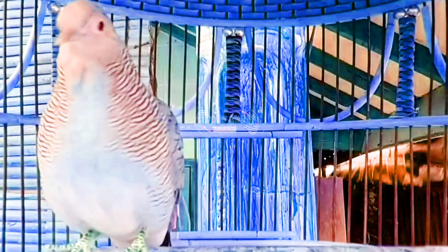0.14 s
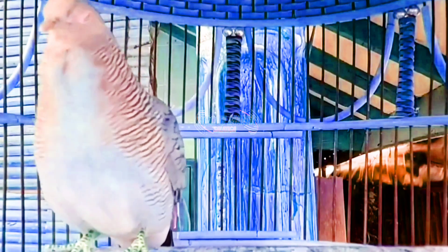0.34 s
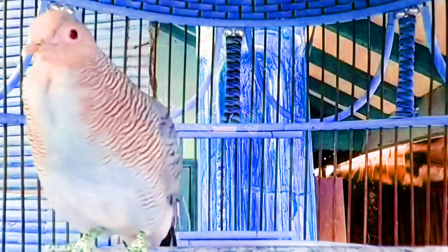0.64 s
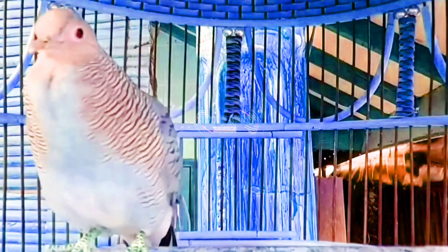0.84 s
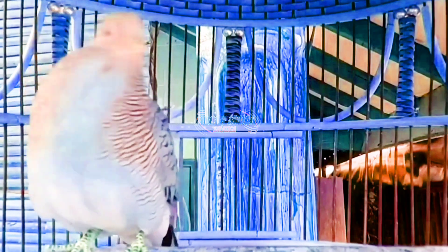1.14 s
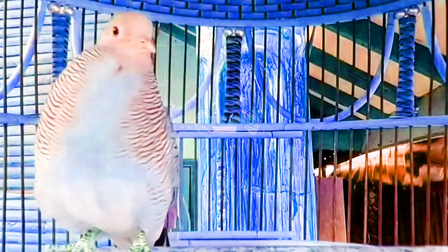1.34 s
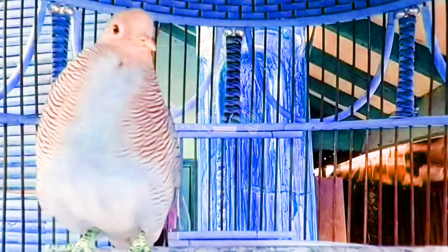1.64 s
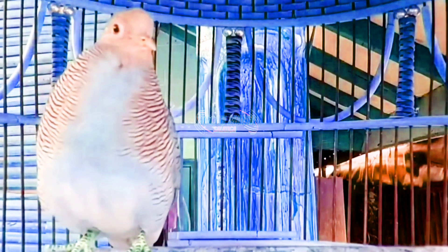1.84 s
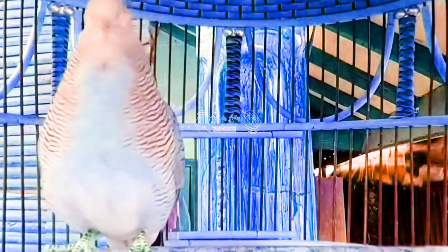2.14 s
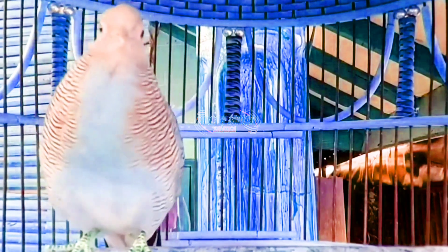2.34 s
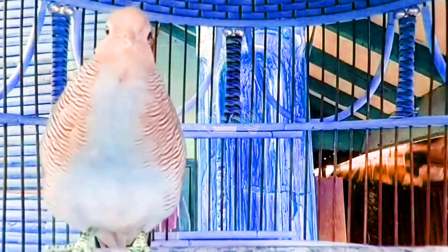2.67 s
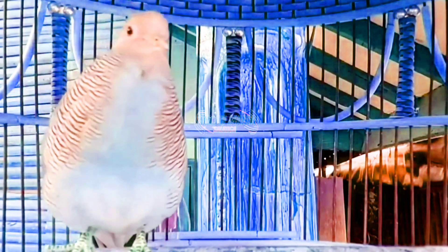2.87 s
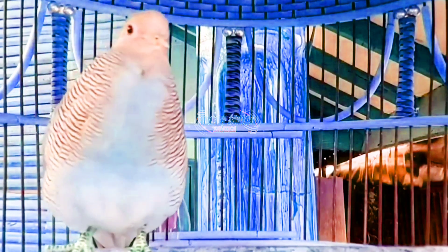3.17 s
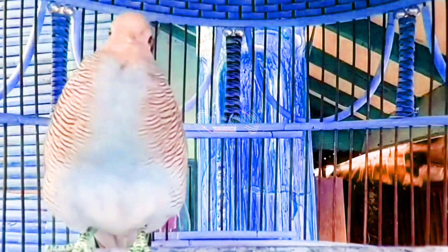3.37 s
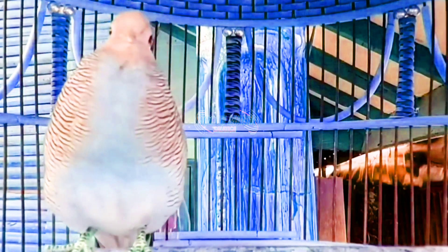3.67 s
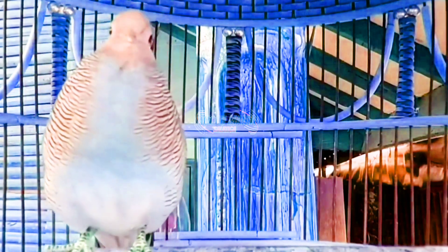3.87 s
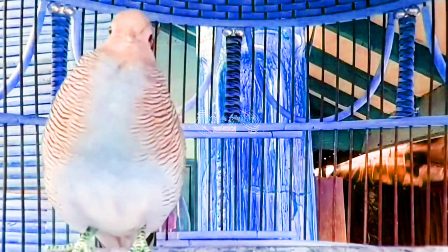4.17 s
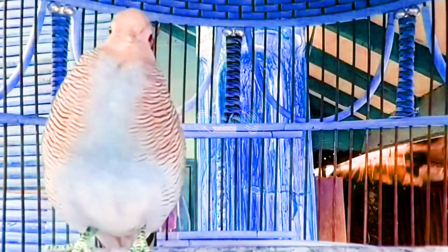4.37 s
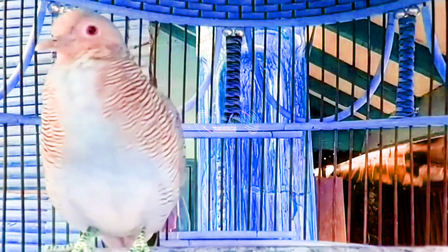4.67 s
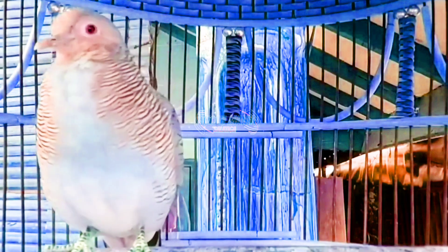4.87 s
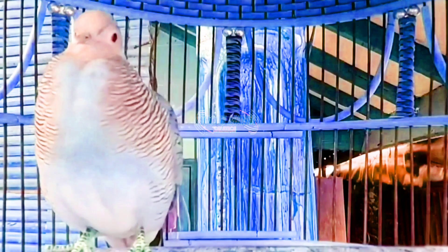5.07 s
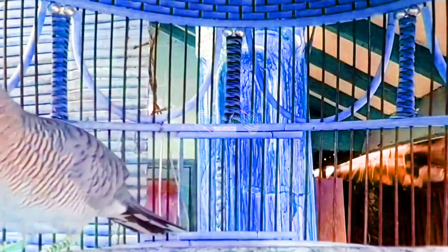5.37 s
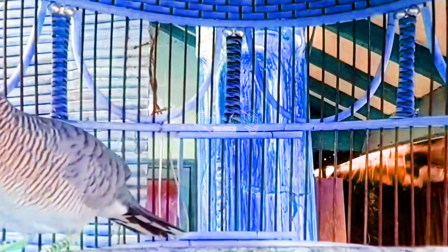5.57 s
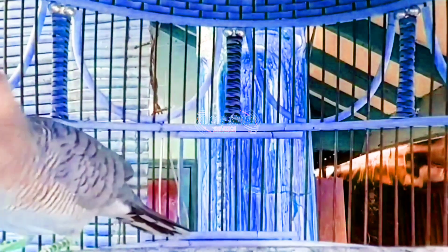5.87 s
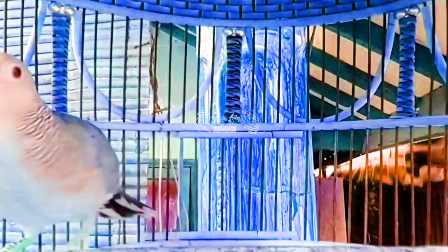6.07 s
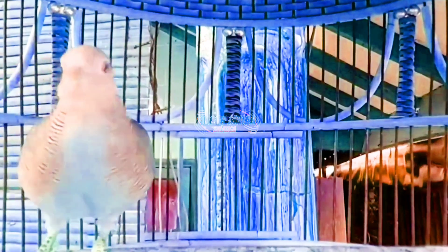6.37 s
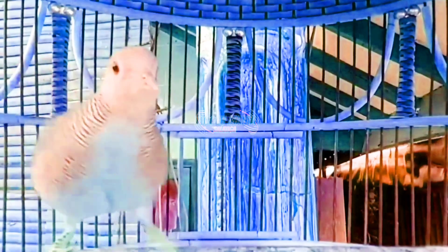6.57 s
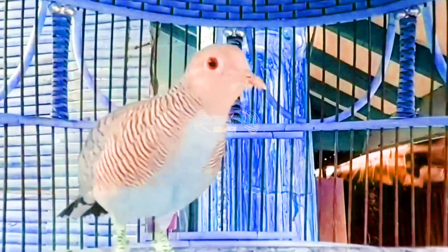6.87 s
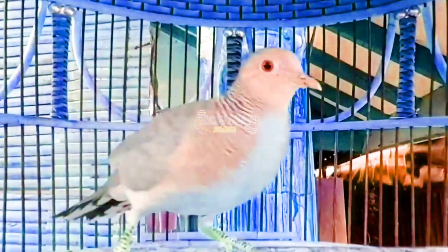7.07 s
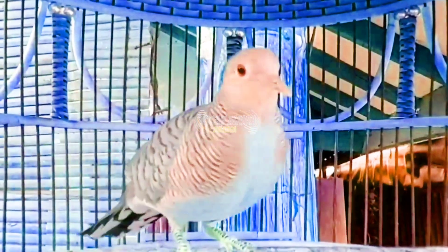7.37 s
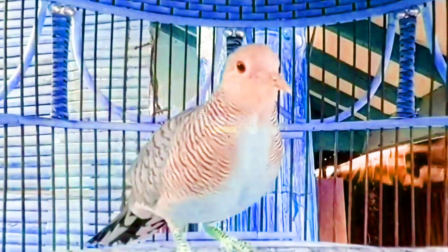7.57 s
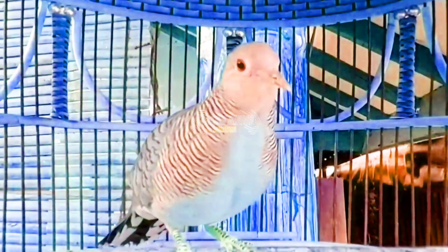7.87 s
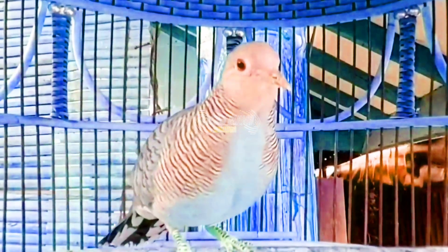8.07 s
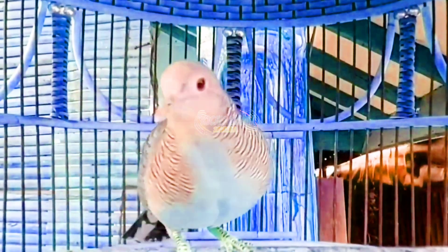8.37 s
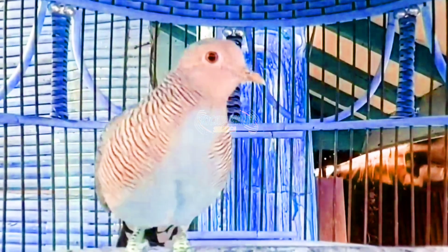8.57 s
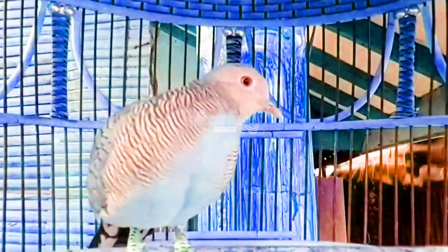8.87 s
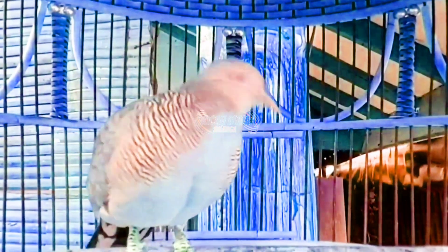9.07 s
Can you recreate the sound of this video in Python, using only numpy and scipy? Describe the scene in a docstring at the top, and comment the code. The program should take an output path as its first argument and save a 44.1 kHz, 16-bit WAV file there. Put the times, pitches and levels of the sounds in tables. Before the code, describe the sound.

Loud pure dove notes scoop upward in quick bursts, then a steady run, while softer throaty coos fall behind them in quiet outdoor air.

```python
"""Caged zebra doves on a porch: one, very close, fires two loud staccato phrases; a second sings a long run of
even notes. Each note starts with a rattle of the syrinx and scoops up in pitch; the loudest have a hard edge of
overtones. Lower coos from farther off arch or fall in pitch, chopped by a trill that dips level and pitch
together. Walls throw short echoes and a diffuse tail; faint hums, small ticks, rustles, tiny squeaks and
outdoor air, made of flickering noise bands, lie behind."""
import sys
import numpy as np
from scipy import signal
from scipy.fft import rfft, irfft, next_fast_len
from scipy.io import wavfile
from scipy.ndimage import uniform_filter1d, minimum_filter1d

SR = 44100
rng = np.random.default_rng(int(sys.argv[2]) if len(sys.argv) > 2 else 0)


def materialize(psi):
    """Save the field psi as 16-bit PCM at rate SR to the path in sys.argv[1].

    A 1-D psi becomes a single channel; in a 2-D psi each row is a channel.
    """
    bounded = np.clip(np.atleast_2d(psi).T, -1, 1)
    quanta = np.round(bounded * 32767).astype(np.int16)
    wavfile.write(sys.argv[1], SR, quanta)


N = 406161
TIME = np.arange(N) / SR  # seconds
CUTOFF_HZ = 15800  # top of the microphone sound


def from_db(db):
    """Decibels to gain."""
    return 10 ** (np.asarray(db) / 20)


def rms_one(x):
    """Scale to unit power."""
    return x / np.sqrt(np.mean(x ** 2) + 1e-20)


def at_hz(points, hz):
    """Read a table on a log-frequency axis."""
    table_hz, values = np.transpose(points)
    return np.interp(np.log(hz), np.log(table_hz), values)


def band(x, low_hz, high_hz):
    """Butterworth band-pass."""
    sos = signal.butter(2, [low_hz, min(high_hz, .49 * SR)], "band", fs=SR, output="sos")
    return signal.sosfilt(sos, x + 1e-18)


def drift(rate, size):
    """Random wander about 0: normal draws, rate of them a second, joined by straight lines."""
    steps = np.arange(size) * rate / SR
    count = int(steps[-1]) + 2
    return np.interp(steps, np.arange(count), rng.standard_normal(count))


def ring(clicks, hz, t60):
    """Two-pole resonator: a unit click sets off a sine of about height 1 that falls 60 dB in t60 seconds."""
    radius = np.exp(-np.log(1000) / (t60 * SR))
    turn = 2 * np.pi * hz / SR
    return signal.lfilter([0, np.sin(turn)], [1, -2 * radius * np.cos(turn), radius ** 2], clicks + 1e-18)


def gate(t, start, end, attack, release):
    """Smooth opening and closing, centred on start and end."""
    opening = (1 + np.tanh((t - start) / attack)) / 2
    closing = (1 + np.tanh((end - t) / release)) / 2
    return opening * closing


def around(start, end):
    """The samples of an event, with a margin."""
    return slice(max(int((start - .03) * SR), 0), min(int((end + .04) * SR), N))


def turning(hz):
    """Phase of an oscillator."""
    return 2 * np.pi * np.cumsum(hz) / SR


def placed(x, left_db):
    """Stereo with the left side raised or lowered."""
    return np.array([x * from_db(left_db), x])


def left_colour(points, hz):
    """Level in dB and phase lead in radians of the left side at a pitch."""
    table_hz, left_db, lead = np.transpose(points)
    return np.interp(hz, table_hz, left_db), np.interp(hz, table_hz, lead)


def staccato(notes, left, overtones, onset_hz, onset_db, droop, scoop, hang, attack, release, waver,
             flutter_db, second_db=-45):
    """Nearly pure notes that scoop up, hold and droop as the air pressure falls; overtones grow with level."""
    out = np.zeros((2, N))
    for start, end, rise, top_hz, sag, body_db, edge_db in notes:
        span = around(start, end)
        t = TIME[span]
        up = np.clip((t - start) / rise, 0, 1)
        along = np.clip((t - start - rise) / max(end - start - rise, .002), 0, 1)
        # with hang, a forced note that starts slowly stays on its low pitch, then breaks upward
        bend = scoop + hang * (rise / .02) ** 2
        climb = .3 * up + .7 * np.sin(np.pi / 2 * up ** bend) ** 2
        hz = onset_hz + (top_hz - onset_hz) * climb
        hz = hz - top_hz * (sag * np.minimum(2 * along, 1) + droop * along ** 6.1)
        hz = hz * (1 + waver * drift(300, len(t)))
        phase = turning(hz)
        level_db = onset_db + (body_db - onset_db) * up ** 4 + flutter_db * drift(64.4, len(t))
        level = from_db(level_db) * gate(t, start, end, attack, release)

        harmonics = sum(from_db(db) * np.sin(round(k) * phase) for k, db in overtones)
        edge = from_db(edge_db) * level ** 3 * harmonics * from_db(2.5 * drift(71, len(t)))
        edge = edge + from_db(second_db) * level * np.sin(2 * phase)
        left_db, lead = left_colour(left, hz)
        tone = level * np.array([from_db(left_db) * np.sin(phase + lead), np.sin(phase)])
        out[:, span] += tone + placed(edge, -17.0)
    return out


def rattle(notes, period, first_db, fade_db, count):
    """Before it sings, the syrinx flaps a few times, ever harder."""
    clicks = np.zeros(N)
    for note in notes:
        back = np.arange(count) + .55 + rng.normal(0, .12, count)  # periods ahead of the note
        where = ((note[0] - back * period) * SR).astype(int)
        clicks[where] = from_db(first_db - fade_db * back + rng.normal(0, 1, count))
    return clicks


def phrases(edge_follows=0.83):
    """The closest dove: pops and rattles ring in the throat, then the note breaks out; louder is harder."""
    # Staccato notes. Each row: start and end in seconds, rise in seconds, top in Hz,
    # sag as a share of the top pitch, relative level in dB.
    note_rows = [(0.708, 0.838, 0.029, 1343, .03, -2), (.863, 0.897, 0.013, 1214, 0.041, 1.5),
                 (.949, .992, .015, 1233, .03, 1.5), (1.06, 1.174, .014, 1263, 0.0205, 0),
                 (2.573, 2.671, .021, 1279, -0.017, -1.1), (2.693, 2.726, .012, 1230, 0.033, 2.5),
                 (2.774, 2.811, .013, 1222, .045, 2.5), (2.869, 2.984, .013, 1249, .026, 1.2),
                 (3.097, 3.205, .015, 1225, -0.01, 0.75)]
    # Single throat pops ahead of a phrase. Each row: time in seconds, relative level in dB.
    pop_rows = [(.645, -13.5), (2.509, -18)]
    # Cage reflections colour the left side. Each row: pitch in Hz, left level in dB, left lead in radians.
    left_side = [(1010, -3.5, .2), (1170, -5.5, .05), (1230, -9, .65), (1255, -10.5, 1.2),
                 (1300, -3.5, 1.1), (1326, -2, .35)]
    # Overtones of a hard-driven note. Each row: multiple of the pitch, relative level in dB.
    overtone_rows = [(3, -22), (5, -36), (7, -45.5)]
    # Wall echoes. Each row: delay in seconds, level in dB.
    echo_rows = [(0.038, -31.5), (.062, -28), (.085, -27)]

    clicks = rattle(note_rows, period=0.0049, first_db=-4, fade_db=2.5, count=4)
    for s, db in pop_rows:
        clicks[int(s * SR)] += from_db(db + 1.5)
    throat = ring(clicks, 1134, 0.032) + .5 * ring(clicks, 1150, 0.011)
    throat = band(band(throat, 577, 1650), 230, 1700)
    # weaker notes lose their hard edge
    rows = [(*timing_and_pitch, db, edge_follows * min(db, 0)) for *timing_and_pitch, db in note_rows]
    notes = staccato(rows, left_side, overtone_rows, onset_hz=1004.5, onset_db=2.5, droop=.11, scoop=0.87,
                     hang=1.7, attack=0.0016, release=0.0041, waver=0.0035, flutter_db=0.88)
    close = from_db(-0.7) * notes + placed(throat, -10.5)
    dull = band(close, 500, 2000)
    tail = from_db(-18) * porch(dull, t60=0.37, build_s=0.02)
    return close + cage(dull) + echoed(dull, echo_rows) + tail


def long_run(sag=-.003):
    """Even notes that lengthen and slow down, each led by a rattle ringing higher than in the phrases."""
    # Notes of the run. Each row: start and end in seconds, rise in seconds, top in Hz,
    # relative level in dB, relative level of the hard edge in dB.
    note_rows = [(5.778, 5.884, 0.08, 1219, -1.5, -12), (5.972, 5.992, 0.015, 1183, -1.5, -9),
                 (6.05, 6.08, 0.018, 1210, -2.5, 5), (6.161, 6.214, 0.024, 1222, -2, 3),
                 (6.305, 6.4, 0.027, 1241, -1, 2.5), (6.503, 6.615, .03, 1223, 0, 1.5),
                 (6.726, 6.847, 0.032, 1216, 0.5, -1), (6.963, 7.096, .021, 1203, -.5, -1.5),
                 (7.212, 7.354, .02, 1200, -3.2, -7), (7.467, 7.618, 0.025, 1191, -0.7, 0),
                 (7.73, 7.876, 0.026, 1185, -1.1, 1), (7.983, 8.135, 0.021, 1177, 0.4, 1.5),
                 (8.272, 8.403, 0.027, 1176, 0.1, 0)]
    # Cage reflections colour the left side. Each row: pitch in Hz, left level in dB, left lead in radians.
    left_side = [(1080, -9.5, 0.00073), (1180, -9, 0), (1230, -10, 0)]
    # Overtones of a hard-driven note. Each row: multiple of the pitch, relative level in dB.
    overtone_rows = [(3, -34), (5, -55)]
    # Wall echoes. Each row: delay in seconds, level in dB.
    echo_rows = [(0.0099, -21), (.021, -14), (.045, -25.5)]

    clicks = rattle(note_rows, period=.006, first_db=-5, fade_db=4.0, count=4)
    throat = ring(clicks, 1418, 0.015) + 0.55 * ring(clicks, 1670, 0.025)
    throat = band(band(throat, 640, 1520), 900, 2100)
    rows = [(start, end, rise, hz, sag, db, edge_db) for start, end, rise, hz, db, edge_db in note_rows]
    notes = staccato(rows, left_side, overtone_rows, onset_hz=1062, onset_db=-4, droop=.045, scoop=0.77,
                     hang=0, attack=0.0051, release=0.004, waver=0.0023, flutter_db=1.8)
    close = from_db(-0.5) * notes + placed(throat + squeak(), -12.0)
    dull = band(close, 500, 2080)
    return close + echoed(dull, echo_rows) + from_db(-23.0) * porch(dull, t60=0.15, build_s=0.024)


def squeak(flap=0.62, jitter=0.0798):
    """Wind-up into the run: a rough, flapping tone swells on one pitch, then flicks upward as it fades."""
    start_s, peak_s, end_s = 5.70, 5.756, 5.777
    base_hz, flick_hz_per_s = 1390, 21500
    peak_db, swell_db_per_s, fade_db_per_s = -8.5, 250, 550
    before = np.maximum(peak_s - TIME, 0)
    after = np.clip(TIME - peak_s, 0, end_s - peak_s)
    level = from_db(peak_db - swell_db_per_s * before - fade_db_per_s * after)
    level = level * gate(TIME, start_s, end_s, .002, .002) * (1 + flap * drift(450, N))
    hz = (base_hz + flick_hz_per_s * after) * (1 + jitter * drift(700, N))
    return level * np.sin(turning(hz))


def coo(start, end, pitch, db, rate, depth, uneven, second_db, lead_s=0.02397):
    """One coo: after a soft lead-in, a trill dips level and pitch together; it smooths late and at low pitch."""
    dip, chirp, jitter = .18, 0.045, 0.021  # shares of the pitch
    smoothing, rough = .25, .13  # shares of trill depth and of level
    trill_from_hz, trill_full_hz = 555, 690
    t = TIME[around(start, end)]
    along = np.clip((t - start) / (end - start), 0, 1)
    high_enough = np.clip((pitch - trill_from_hz) / (trill_full_hz - trill_from_hz), .12, 1)
    chop = np.clip(depth * (1 - smoothing * along ** 2), 0, 1) * high_enough
    beat = turning(rate * (t > start + lead_s) * (1 + uneven * drift(60, len(t))))
    closed = (.5 + .5 * np.cos(beat)) ** (1.4 + 9 * uneven)  # an uneven trill has only brief catches
    # within each beat the pitch climbs, then slips back as the syrinx closes
    slip = chop * (dip * (closed - .15) + chirp * chop ** 2 * np.sin(beat))
    phase = turning(pitch * (1 - (slip + jitter * drift(250, len(t)))))
    level = from_db(db + 1.5 * drift(30.1, len(t))) * (1 - chop * closed) * (1 + rough * drift(220, len(t)))
    voice = np.sin(phase) + from_db(second_db) * np.sin(2 * phase)
    return np.sqrt(2) * level * gate(t, start, end, 0.001, 0.0038) * voice


def long_coos(quicken=1.8, second_db=-39):
    """Each scoops up, then sinks ever faster; level follows pitch and the trill quickens toward the end."""
    # Long falling coos. Each row: start and end in seconds, top in Hz, lateness of the fall as an exponent,
    # level in dB before fading, trill beats per second at first, trill depth 0-1, unevenness of the trill.
    rows = [(0.121, .562, 776, 2.35, -16, 55, 0.48, 0.33), (1.335, 1.776, 759, 2.5, -17, 41, 0.54, 0.34),
            (2.588, 3.014, 755, 2.6, -16.5, 57, 0.58, .22),
            (4.767, 5.273, 815, 1.75, -18.4, 46.3, 0.89, 0.029),
            (7.669, 8.195, 810, 2.33, -17.3, 52, .85, 0.042)]
    scoop, scoop_s, drop, drop_s = .3, .018, .14, .012  # shares of the pitch, and their times
    end_hz = 500  # before the last drop
    knee_hz, fade_db_per_hz = 735, .02  # the coo weakens below the knee
    break_hz, break_width_hz, tail_db = 635, 18, -7.5  # below the break, a further fall to a soft tail
    out = np.zeros(N)
    for start, end, top_hz, lateness, db, rate, depth, uneven in rows:
        span = around(start, end)
        t = np.clip(TIME[span], start, end)
        along = (t - start) / (end - start)
        pitch = top_hz + (end_hz - top_hz) * along ** lateness
        pitch = pitch * (1 - scoop * np.exp(-((t - start) / scoop_s) ** 2))
        pitch = pitch * (1 - drop * np.exp((t - end) / drop_s))
        level_db = db - fade_db_per_hz * np.maximum(knee_hz - pitch, 0)
        level_db = level_db + tail_db * (1 + np.tanh((break_hz - pitch) / break_width_hz)) / 2
        quickening = rate * (1 + quicken * along ** 3)
        out[span] += coo(start, end, pitch, level_db, quickening, depth, uneven, second_db)
    return out


def short_coos(uneven=0.093):
    """Pitch and level rise and fall together in one arch; soft grunts join the pairs."""
    # Short arched coos. Each row: start and end in seconds, top in Hz, place of the top 0-1, flatness as an
    # exponent, level at the top in dB, trill beats per second, trill depth 0-1, second harmonic in dB.
    arch_rows = [(1.019, 1.224, 706, .48, 7, -18, 79, .85, -43),
                 (2.272, 2.48, 697, .45, 6.7, -19.5, 73, .9, -44),
                 (4.128, 4.212, 605, .45, 2.6, -27.5, 60, .2, -13.5),
                 (4.377, 4.583, 677, .6, 3.13, -19.5, 62, .55, -28.5),
                 (7.051, 7.139, 677, .5, 2.2, -17, 70, 0.84, -30.5),
                 (7.275, 7.49, 744.6, .64, 1.8, -18.5, 79, .55, -41)]
    # Low grunts between paired coos. Each row: start and end in seconds, level in dB.
    grunt_rows = [(4.205, 4.238, -32), (4.24, 4.28, -40.5), (4.34, 4.385, -35.5), (7.135, 7.163, -33),
                  (7.243, 7.285, -33.5)]
    foot_hz, foot_db = 490, -13  # pitch and relative level at both ends of an arch
    grunt_hz, grunt_second_db = 454.3, -9.5
    out = np.zeros(N)
    for start, end, top_hz, top_at, flatness, db, rate, depth, second_db in arch_rows:
        span = around(start, end)
        along = (TIME[span] - start) / (end - start)
        off_top = np.interp(along, [0, np.clip(top_at, .1, .9), 1], [1, 0, 1]) ** flatness
        pitch = top_hz + (foot_hz - top_hz) * off_top
        level_db = db + foot_db * off_top
        out[span] += coo(start, end, pitch, level_db, rate, depth, uneven, second_db, lead_s=.014)
    for start, end, db in grunt_rows:
        out[around(start, end)] += coo(start, end, grunt_hz, db, 0, 0, 0, grunt_second_db)
    return out


def cooing(porch_db=-10):
    """The low coos come from farther off, with more of the porch in them."""
    # Stereo colour. Each row: pitch in Hz, left minus right in dB, left lead over right in radians.
    left_side = [(480, -1.5, .3), (560, -3.5, 1), (590, -1, 1.1), (655, 5, .6), (720, 1.5, .3),
                 (800, -1.5, .3)]
    # Far wall heard after the coos. Each row: delay in seconds, level in dB.
    echo_rows = [(.088, -24.5)]
    size = next_fast_len(N)
    left_db, lead = left_colour(left_side, np.arange(size // 2 + 1) * SR / size)
    half = from_db(left_db / 2) * np.exp(1j * lead / 2)  # shared out between the two sides
    spectrum = rfft(long_coos() + short_coos(), size)
    coos = irfft(spectrum * np.array([half, 1 / half]), size)[:, :N]
    tail = from_db(porch_db) * porch(coos, t60=0.2, build_s=0.024)
    return coos + echoed(coos, echo_rows) + tail


def cage(x):
    """The cage keeps ringing on one pitch after the loud notes: a narrow resonance."""
    hz, t60, peak_db = 1235, .6, -15.5
    unit_peak = 2 * np.log(1000) / (t60 * SR)  # brings the resonator to unit gain at its pitch
    return from_db(peak_db) * unit_peak * ring(x, hz, t60)


def echoed(x, echoes):
    """Reflections off walls; the bird's sway shifts their paths a little."""
    out = np.zeros((2, N))
    for delay, db in echoes:
        for side in range(2):
            heard_from = TIME - delay + 3e-5 * drift(1.967, N)
            out[side] += from_db(db) * np.interp(heard_from, TIME, x[side])
    return out


def porch(x, t60, build_s):
    """A diffuse tail of decaying noise, different in each channel."""
    t = TIME[:SR]
    tail = rng.standard_normal((2, SR)) * np.exp(-np.log(1000) * t / t60) * (1 - np.exp(-t / build_s))
    tail = tail / np.sqrt(np.sum(tail ** 2) / 2)
    return signal.fftconvolve(x, tail, axes=1)[:, :N]


def hums(fade_s=0.037):
    """Faint far tones swell, waver and fade; the wider ones are mere rumbles."""
    # Distant hums and rumbles. Each row: start and end in seconds, pitch in Hz, width in Hz,
    # relative level in dB.
    rows = [(.15, .72, 153.6, 29, -50.5), (.9, 1.623, 177, 16, -50), (3.721, 4.4, 68.2, 63, -56.5),
            (4.3, 4.617, 207, 10, -52), (4.679, 4.8, 319, 28, -47), (6.425, 6.88, 322, 11.4, -45),
            (6.789, 6.968, 299.6, 14, -48), (7.149, 7.424, 75, 81, -52.5), (8.1, 8.3, 166, 26, -54),
            (8.497, 9.1, 310, 37, -58.5)]
    out = np.zeros(N)
    for start, end, hz, width_hz, db in rows:
        span = around(start - 2 * fade_s, end + 2 * fade_s)
        t = TIME[span]
        wander = width_hz / 3 * drift(2 * width_hz, len(t))
        level = from_db(db + 3 * drift(25, len(t))) * gate(t, start, end, fade_s, fade_s)
        out[span] += level * np.sin(turning(hz + wander))
    return placed(out * from_db(5.5), -5.0)


def ticks(decay_s=0.0034, swell_s=0.0014):
    """Short dry ticks of perch and bars: brief bursts of noise."""
    # Small ticks in the cages. Each row: time in seconds, relative level in dB.
    rows = [(0.385, -30), (0.9199, -25), (2.6335, -23), (3.232, -28), (3.4456, -25), (5.475, -24),
            (5.7424, -27.5), (6.0592, -25), (7.59, -22), (7.8596, -20), (8.655, -26), (8.7286, -22),
            (8.8738, -25), (9.1007, -30.5)]
    out = np.zeros(N)
    for s, db in rows:
        span = around(s, s)
        t = np.maximum(TIME[span] - s + swell_s, 0)
        shape = np.exp(-t / decay_s) * (1 - np.exp(-t / swell_s))
        out[span] += from_db(db - 1) * shape * rng.standard_normal(len(t))
    return placed(band(band(out, 1500, 9000), 800, 11000), -1)


def scattered(per_s, spread_db, grain_s):
    """Smooth swells at random moments and of uneven size."""
    sizes = from_db(spread_db * np.minimum(rng.exponential(1, N), 2.5))
    births = (rng.random(N) < per_s / SR) * sizes
    return signal.fftconvolve(births, np.hanning(int(grain_s * SR)), "same")


def crackle(per_s=20, spread_db=3.5, grain_s=0.0072, db=-50):
    """A faint scatter of tiny noise rustles in five bands, each band wandering in direction."""
    out = np.zeros((2, N))
    for low, high, tilt_db in [(1350, 2340, 8.5), (2470, 3470, 5), (3650, 7800, 4),
                               (6240, 9500, 3), (9200, 14000, -7)]:
        noise = rms_one(band(rng.standard_normal(N), low, high))
        rustle = scattered(per_s, spread_db, grain_s) * noise
        out += from_db(db + tilt_db) * placed(rustle, -1 + 4 * drift(15, N))
    return out


def blips(per_s=7.0, length_s=0.021, spread_db=3.5, db=-51, fade_s=.15, count=6):
    """Tiny pitched squeaks, barely above the air, louder in flurries; per_s counts those of each pitch."""
    # Flurries. Each row: start and end in seconds, lift over the usual in dB.
    flurry_rows = [(4.0, 5.0, 6), (8.5, 8.98, 10)]
    out = np.zeros(N)
    for hz in np.geomspace(1000, 2100, count):
        tone = np.sin(turning(hz * (1 + .06 * drift(160, N))))
        out += scattered(per_s, spread_db, length_s) * tone
    flurry_db = sum(lift_db * gate(TIME, start, end, fade_s, fade_s) for start, end, lift_db in flurry_rows)
    return placed(from_db(db + flurry_db) * out, -.5)


def air(follow=0.81, low_db=2.0, total_db=-41.5, patchy_db=3.0):
    """Outdoor rumble and hiss: noise in bands that flicker a little."""
    # Spectrum of the outdoor air. Each row: frequency in Hz, relative level in dB per Hz.
    colour = [(18, -47.5), (30, -12), (59, -7), (144, -3.5), (232, -9), (301, -0.5), (401, -7), (595, -5.5),
              (978, -1), (1880, -5.5), (2150, -3), (4350, -15.5), (8170, -11.5), (12400, -33),
              (15700, -12.5)]
    # Left-right likeness. Each row: frequency in Hz, correlation 0-1.
    likeness = [(60, 0.76), (240, 0.69), (950, 1), (3770, 1), (15000, .95)]
    # The rumble leans to the right. Each row: frequency in Hz, left minus right in dB.
    lean_rows = [(60, -5), (170, -5.5), (400, -1.5), (8000, 0)]
    # Course of the rumble below 500 Hz. Each row: time in seconds, relative level in dB.
    rumble_rows = [(0.0, -51), (0.49, -48), (0.79, -56), (1.36, -47.5), (1.74, -56), (2.2, -59.5),
                   (2.77, -56), (3.67, -60.5), (3.95, -55), (5.23, -52.5), (5.64, -59), (7.31, -51),
                   (7.41, -53), (9.21, -55.5)]
    # Course of the hiss above it. Each row: time in seconds, relative level in dB.
    hiss_rows = [(0.0, -49.5), (0.77, -51), (1.08, -47), (1.79, -51), (5.57, -52), (8.69, -50), (9.21, -52)]
    edges = np.geomspace(25, CUTOFF_HZ, num=25)
    white = rng.standard_normal((2, 2, N))  # neighbouring bands take separate noise
    out = np.zeros((2, N))
    for k, (low, high) in enumerate(zip(edges, edges[1:])):
        hz = np.sqrt(low * high)
        mid, side = band(white[k % 2], low, high)
        alike = np.clip(at_hz(likeness, hz), 0, 1)
        s, level_db = np.transpose(rumble_rows if hz < 500 else hiss_rows)
        swell = follow * (level_db - np.mean(level_db)) + (low_db if hz < 500 else 0)
        gain = from_db(at_hz(colour, hz) + np.interp(TIME, s, swell) + patchy_db * drift(20, N))
        lean = from_db(np.array([[1], [-1]]) * at_hz(lean_rows, hz) / 2)
        wide = np.sqrt(1 + alike) * mid + np.sqrt(1 - alike) * np.array([side, -side])
        out += gain * lean * wide
    return from_db(total_db) * rms_one(out)


def scene():
    """All the birds over the background."""
    birds = phrases() + long_run() + cooing()
    return birds + hums() + ticks() + crackle() + blips() + air()


def record(dry):
    """A fast limiter holds each channel under full scale; the top is cut."""
    room_left = np.minimum(1, .985 / (np.abs(dry) + 1e-9))
    # lowest gain within 5 ms, smoothed over 5 ms
    gain = uniform_filter1d(minimum_filter1d(room_left, size=221, axis=1), size=221, axis=1)
    top_cut = signal.ellip(10, .1, 80, CUTOFF_HZ, fs=SR, output="sos")
    return signal.sosfilt(top_cut, dry * gain)


dry = scene()
out = record(dry)
materialize(out)
```